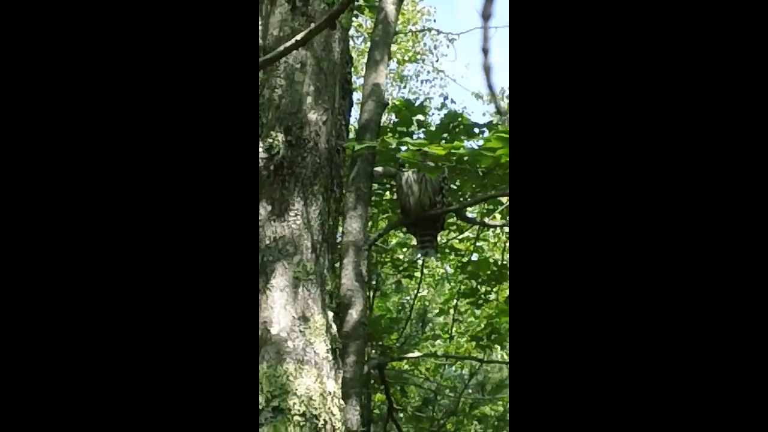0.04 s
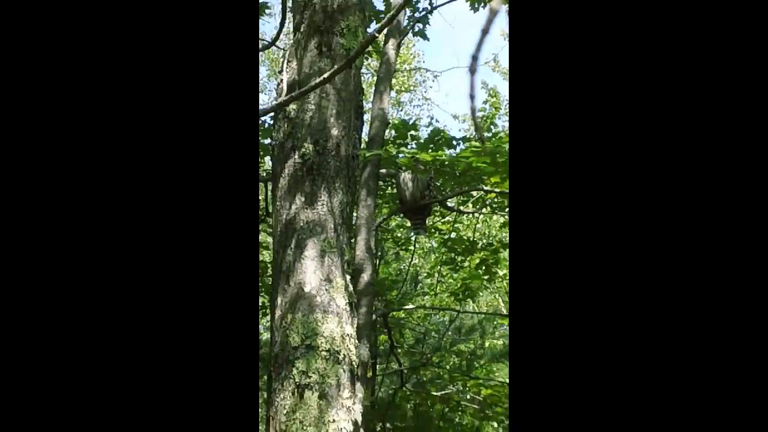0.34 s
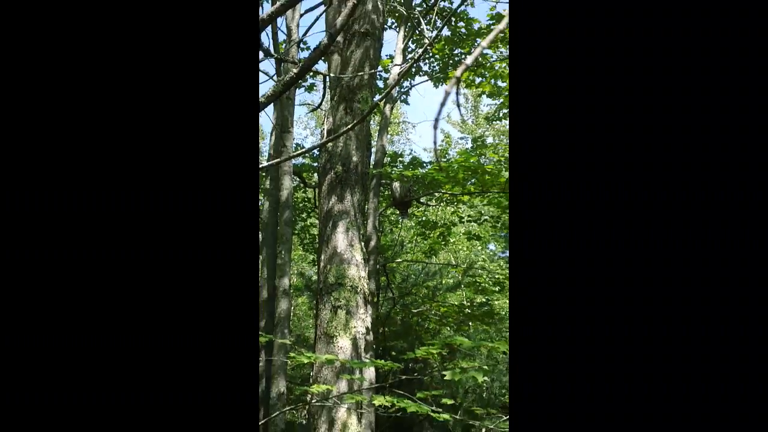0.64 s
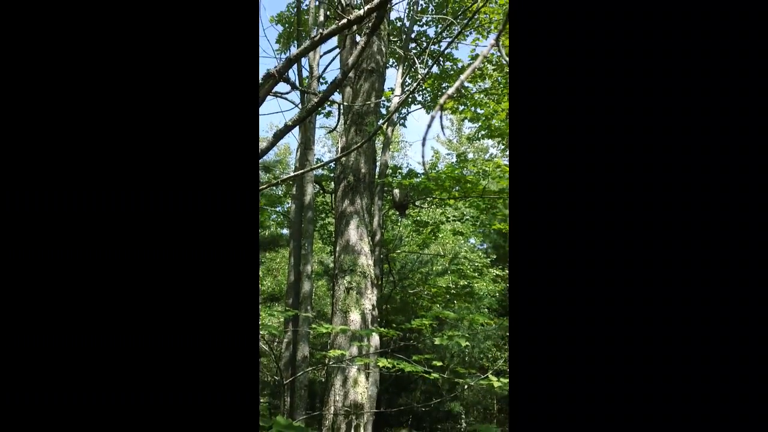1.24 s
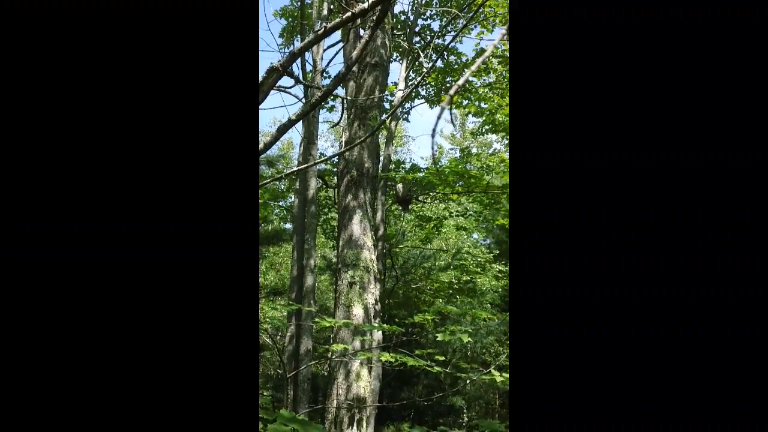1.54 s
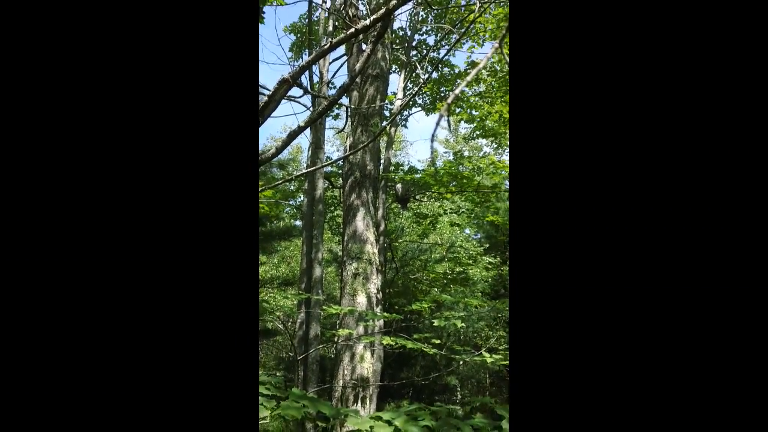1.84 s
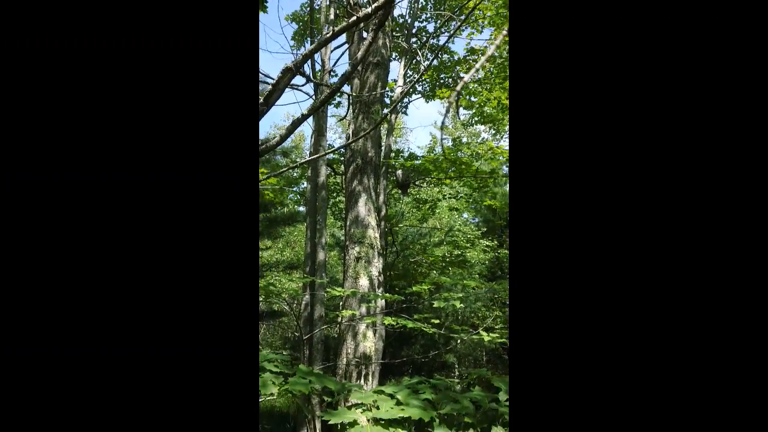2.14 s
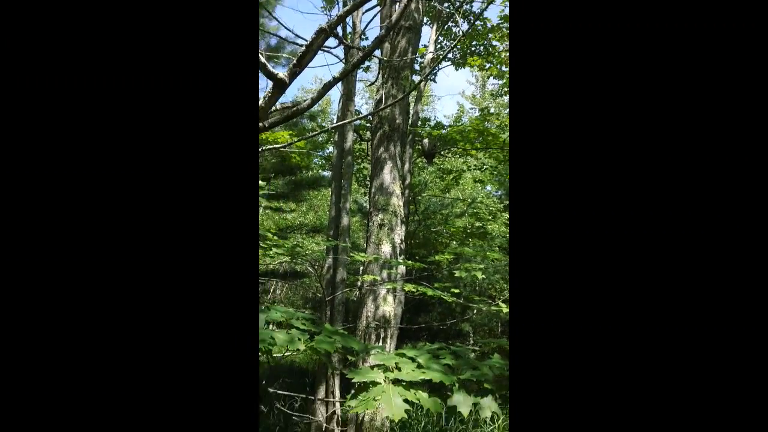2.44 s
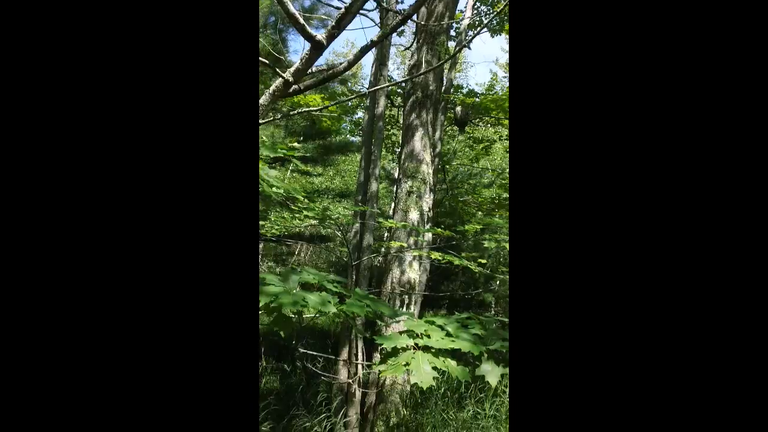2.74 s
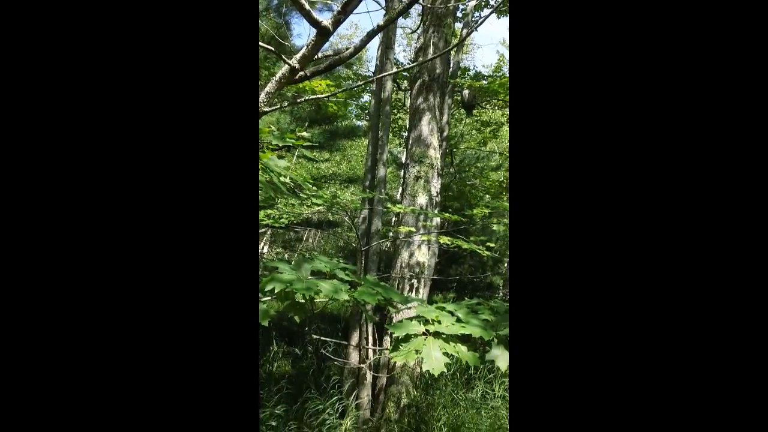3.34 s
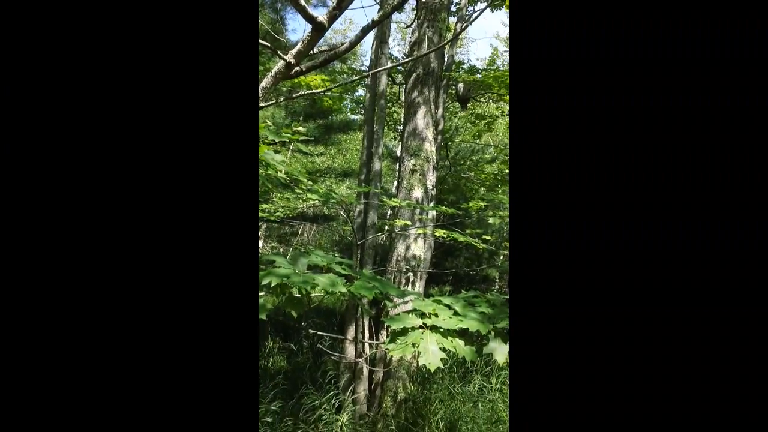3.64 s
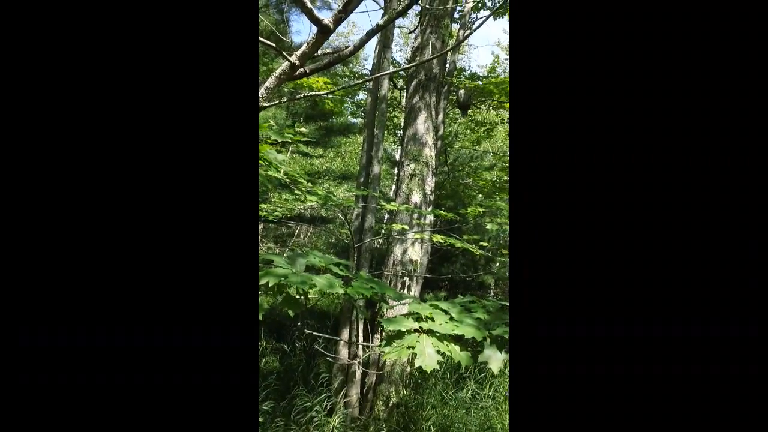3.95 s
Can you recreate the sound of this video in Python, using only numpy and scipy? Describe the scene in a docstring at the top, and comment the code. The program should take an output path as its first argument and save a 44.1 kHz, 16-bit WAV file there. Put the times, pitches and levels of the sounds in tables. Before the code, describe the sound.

A small animal, probably a chipmunk, chirps sharply in a forest with light wind and twig snaps.

```python
"""First comes the ring of an alarm chip dying away in a wood, over light wind and a faint far rumble.
The caller, probably a chipmunk, keeps chipping: each call is a short arch of pitch, strongest in its
second harmonic. Trunks scatter the chips and the forest rings on at their top pitch.
Near the microphone twigs snap, leaves swish and dead wood knocks softly underfoot."""
import sys
import numpy as np
from scipy import signal
from scipy.fft import rfft, irfft, next_fast_len
from scipy.io import wavfile
from scipy.ndimage import map_coordinates

SR = 44100
rng = np.random.default_rng(int(sys.argv[2]) if len(sys.argv) > 2 else 0)


def inscribe(sig):
    """Save sig as 16-bit PCM at rate SR to the path in sys.argv[1].

    A 1-D sig is mono; a 2-D sig holds one channel per row.
    Samples are clipped to [-1, 1] before scaling.
    """
    pcm = np.round(np.clip(np.atleast_2d(sig).T, -1, 1) * 32767)
    wavfile.write(sys.argv[1], SR, pcm.astype(np.int16))


N = 176400


def amp(db):
    """Decibels to gain."""
    return 10 ** (np.asarray(db) / 20)


def unit(x):
    """Scale to rms 1."""
    return x / np.sqrt(np.mean(x ** 2) + 1e-20)


def db_at(spectrum, hz):
    """Read (Hz, dB) points along a log frequency axis."""
    freqs, levels = np.transpose(spectrum)
    return np.interp(np.log(hz + 1), np.log(freqs + 1), levels)


def curve(rows):
    """Join (seconds, value) points, one value per sample."""
    return np.interp(np.arange(N) / SR, *np.transpose(rows))


def wobble(rate):
    """A smooth random curve, rate knots a second."""
    return map_coordinates(rng.standard_normal(8192), [np.arange(N) * rate / SR], mode="wrap")


def filtered(x, response):
    """Filter x by a gain that depends on frequency."""
    size = next_fast_len(N + 8192)
    return irfft(rfft(x, size) * response(np.fft.rfftfreq(size, 1 / SR)), size)[:N]


def noise(spectrum):
    """Coloured noise of rms 1."""
    return unit(filtered(rng.standard_normal(N), lambda hz: amp(db_at(spectrum, hz))))


def add(track, start, sound):
    """Mix a sound in at start seconds; whatever lies outside the track is cut."""
    i = round(start * SR)
    part = sound[max(-i, 0):max(N - i, 0)]
    track[max(i, 0):][:len(part)] += part


def burst(start, rise, t60):
    """An envelope that rises, then falls 60 dB in t60 seconds."""
    t, out = np.arange(int((rise + t60) * SR)) / SR, np.zeros(N)
    add(out, start, np.minimum(t / rise, 1) * amp(-60 * np.maximum(t - rise, 0) / t60))
    return out


# The low end, far off. Each row: frequency in Hz, relative level in dB.
RUMBLE_SPECTRUM = [(30, -41), (66, -23), (83, -0.5), (100, -10.5), (135, -23.5), (300, -63)]
# Its slow swell. Each row: time in seconds, relative level in dB.
RUMBLE_SWELL = [(0, -58), (.7, -53), (1.2, -52), (2.2, -51.5), (2.8, -53), (3.9, -57)]


def distant_rumble():
    """A faint rumble near 83 Hz swells and recedes in the distance."""
    return noise(RUMBLE_SPECTRUM) * amp(curve(RUMBLE_SWELL) - 0.5)


# Wind overhead. Each row: frequency in Hz, relative level in dB.
WIND_SPECTRUM = [(20, -25), (35, -15.5), (55, -9.5), (110, -2.5), (170, -6.5), (300, -7), (550, -7),
                 (760, -5.5), (1100, -9), (1800, -12.5), (3000, -19.5), (4500, -23), (6400, -24.5),
                 (9500, -27.5), (11800, -37.5), (14300, -35.5), (15500, -34.5)]
# Its strength. Each row: time in seconds, relative level in dB.
WIND_STRENGTH = [(0.0, -46), (0.45, -46), (1.03, -44.5), (2.23, -44.5), (2.55, -46.5), (2.9, -46),
                 (3.32, -45.5), (3.7, -45)]


def wind():
    """Light wind in the crowns, with slight gusts and a quicker flutter."""
    air = noise(WIND_SPECTRUM)
    gust_db, flutter_db = .12 * wobble(4.69), .35 * wobble(40)
    return air * amp(curve(WIND_STRENGTH) + 1.4 + gust_db + flutter_db)


# The thud of a footfall. Each row: frequency in Hz, relative level in dB.
THUD_SPECTRUM = [(60, -21), (150, -16), (700, -12), (1500, -27), (5000, -40), (15000, -58)]
# Knocks at ground level. Each row: start in seconds, resonance in Hz, level in dB, t60 in seconds.
KNOCKS = [(3.441, 430, -42.5, 0.19), (3.49, 600, -42, 0.18), (3.745, 800, -36, 0.069),
          (3.749, 520, -39, .05)]


def wood_knocks(width_hz=46, ring_db=5):
    """Dead wood knocks softly underfoot: a dull thud with one resonance."""
    out = np.zeros(N)
    for start, ring_hz, db, t60 in KNOCKS:
        ring = lambda hz: amp(ring_db) / (1 + ((hz - ring_hz) / width_hz) ** 2)
        colour = lambda hz: amp(db_at(THUD_SPECTRUM, hz)) + ring(hz)
        knock = unit(filtered(rng.standard_normal(N), colour))
        out += amp(db) * knock * burst(start, rise=.0042, t60=t60)
    return out


# Dry litter on the forest floor. Each row: frequency in Hz, relative level in dB.
CRACKLE_SPECTRUM = [(1200, -6), (2000, -5.5), (2800, -7.5), (4000, -2.5), (6000, -3), (9000, -0.5),
                    (11400, -7), (12400, -21), (14300, -15), (15500, -19)]


def crackle(tilt_db, low_hz=2200):
    """Bright noise of dry twigs and leaves, tilted by tilt_db an octave and rolled off below low_hz."""
    def colour(hz):
        low_cut = hz ** 2 / (hz ** 2 + low_hz ** 2)
        return amp(db_at(CRACKLE_SPECTRUM, hz) + tilt_db * np.log2((hz + 1) / low_hz)) * low_cut
    return unit(filtered(rng.standard_normal(N), colour))


# Leaves nearby. Each row: start, rise and t60 in seconds, level in dB, tilt in dB per octave.
LEAF_SWISHES = [(1.08, 0.11, .9, -51, -4.5), (1.3, 0.071, 0.98, -46, -8.5),
                (1.579, .006, 0.33, -37.5, -3.5), (1.6, 0.024, 0.51, -45.5, -4)]


def leaf_swishes():
    """Dry leaves swish up and die away slowly."""
    return sum(amp(db) * crackle(tilt) * burst(start, rise, t60)
               for start, rise, t60, db, tilt in LEAF_SWISHES)


# Twigs nearby. Each row: start in seconds, crack and echo levels in dB, tilt in dB per octave.
TWIG_SNAPS = [(0.9845, -26, -35.5, 1), (1.203, -35, -49, 8.5), (1.292, -40, -45, -1.5),
              (1.5329, -43, -42.5, -1.5), (1.591, -40, -40.5, -2.5), (1.8881, -49, -54, 3)]


def twig_snaps():
    """A twig cracks sharply and the wood echoes it."""
    out = np.zeros(N)
    for start, db, echo_db, tilt in TWIG_SNAPS:
        crack = amp(db) * burst(start, rise=.00042, t60=.012)
        echo = amp(echo_db) * burst(start, rise=.004, t60=.61)
        out += crackle(tilt) * (crack + echo)
    return out


# Twigs close to the microphone. Each row: start in seconds, level in dB, tilt in dB per octave.
TWIG_TICKS = [(2.3564, -31, -4.5), (2.361, -33, -7), (2.3642, -44, -2.5), (3.3545, -37, 0),
              (3.3625, -38.5, -1)]


def twig_ticks():
    """The nearest twigs only tick, with no echo."""
    return sum(amp(db) * crackle(tilt, low_hz=1100) * burst(start, rise=.001, t60=.0058)
               for start, db, tilt in TWIG_TICKS)


def forest_echo(call, near_t60=.18, far_t60=.67, far_db=-12.5, onset_s=.0021):
    """Dense scatter from near trunks, then a long faint tail; the echo has the energy of the call."""
    t = np.arange(SR * 3 // 4) / SR
    fade = amp(-60 * t / near_t60) + amp(far_db - 60 * t / far_t60)
    scatter = rng.standard_normal(len(t)) * fade * (1 - np.exp(-t / onset_s))
    echo = signal.fftconvolve(call, scatter)
    return echo * np.linalg.norm(call) / np.linalg.norm(echo)


# The animal's throat. Each row: frequency in Hz, gain in dB.
THROAT_RESPONSE = [(1500, -14), (2600, -9.5), (3300, 0.5), (4200, -6.5), (5500, -4.5), (6500, -0.5),
                   (9300, -2), (10400, -9), (12000, -24), (15000, -21)]


def harmonic(k, pitch_hz, db):
    """Harmonic k of the voice, coloured as it sweeps through the throat's resonances."""
    phase = 2 * np.pi * np.cumsum(pitch_hz) / SR
    return np.sqrt(2) * amp(db + db_at(THROAT_RESPONSE, k * pitch_hz)) * np.sin(k * phase)


def pitch_arch(u):
    """Pitch as a share of its top, for u from -1 to 1: it shoots up, arches over and plunges."""
    arch = .0702 * (u - .092) ** 2  # peaks a little past the middle
    sweep = np.where(u < 0, .404 * abs(u) ** 9.09, .364 * abs(u) ** 6.2)
    return 1 - arch - sweep


# The voice's weaker harmonics. Each row: multiple of the fundamental, relative level in dB.
WEAK_HARMONICS = [(1, -17.5), (3, -13), (4, -21.5)]
# Its rasp. Each row: frequency in Hz, relative level in dB.
RASP_SPECTRUM = [(1500, -26), (3000, -4.5), (5500, -2.5), (9500, -1.5), (11500, -20.5), (16000, -30)]
# Calls from among the trees. Each row: start and length in seconds, top of the fundamental in Hz,
# then direct gain, echo gain, the second harmonic's gain in the sweeps and harshness, all in dB.
ALARM_CHIPS = [(-.05, 0.027, 3354, -27, -30.5, 3, -2), (0.3745, 0.033, 3366, -31, -29, 3.5, 0.5),
               (0.7526, .029, 3286, -27.5, -29, 0.5, -1.5), (1.4, .031, 3412, -31.5, -31.5, 6, 4),
               (2.044, 0.031, 3407, -30, -26.5, 1, 0.5), (2.57, 0.032, 3454, -19.5, -24.5, -4, -4.5),
               (3.101, .030, 3453, -28, -25, -3.5, 0.5), (3.441, .030, 3196, -29, -30, -5, 2),
               (3.892, 0.0308, 3240, -31.5, -35.5, 2, 1)]
RASP_DB, RASP_SWEEP_DB, WEAK_SWEEP_DB, PLUNGE_DB = -21, 14.5, 3, 4
ATTACK_S, RELEASE_S, SWELL_DB = .0023, .0011, 1.5
TRUNK_DB, TRUNK_SPREAD_S = -14.5, .012


def alarm_chips():
    """Each chip turns hard and raspy in its two sweeps, and arrives both direct and off the trees."""
    out, rasp = np.zeros(N), noise(RASP_SPECTRUM)
    jitter = 1 + .006 * wobble(rate=900)
    for start, length, top_hz, db, echo_db, sweep_db, harsh_db in ALARM_CHIPS:
        t = np.arange(int(length * SR)) / SR
        here = np.arange(len(t)) + int(abs(start) * SR)
        u = 2 * t / length - 1  # u ** 2 is large in the sweeps; u ** 3 favours the plunge
        pitch_hz = top_hz * pitch_arch(u) * jitter[here]
        whistle = harmonic(2, pitch_hz, sweep_db * u ** 2 + PLUNGE_DB * u ** 3)
        edge = sum(harmonic(k, pitch_hz, level + WEAK_SWEEP_DB * u ** 2) for k, level in WEAK_HARMONICS)
        grit = amp(RASP_DB + RASP_SWEEP_DB * u ** 2) * rasp[here]
        gate = np.clip(t / ATTACK_S, 0, 1) * np.clip((length - t) / RELEASE_S, 0, 1)
        call = gate * amp(SWELL_DB * u / 2) * (whistle + amp(harsh_db) * (edge + grit))
        add(out, start, amp(db) * call)
        for delay in rng.uniform(0, TRUNK_SPREAD_S, size=4):  # reflections off the nearest trunks
            add(out, start + delay, amp(echo_db + TRUNK_DB) * call)
        add(out, start, amp(echo_db) * forest_echo(call))
    return out


def scene():
    """The whole wood sits dead centre, the same in both channels."""
    chips = alarm_chips()
    snaps, ticks, leaves, knocks = twig_snaps(), twig_ticks(), leaf_swishes(), wood_knocks()
    grain = unit(amp(1.1 * wobble(rate=600)))  # a fast flicker roughens twigs and leaves
    centre = chips + (snaps + leaves) * grain + ticks + knocks + wind() + distant_rumble()
    return np.array([centre, centre])


# Hiss at the microphone. Each row: frequency in Hz, relative level in dB.
HISS_SPECTRUM = [(20, -21.5), (100, 2), (250, 8), (600, 6), (1200, -20.5), (3000, 0.5), (5000, 2),
                 (9500, 0), (11800, -14.5), (14500, -1), (15600, -5.5)]
HISS_DB, STOP_S = -63.5, 3.912
NOTCH_HZ, NOTCH_WIDTH_HZ, NOTCH_DB, TOP_HZ = 12750, 360, -26, 15600


def record(dry):
    """Each channel hisses faintly; the microphone has a narrow treble notch and passes nothing on top."""
    def microphone(hz):
        notch_db = NOTCH_DB * np.exp(-((hz - NOTCH_HZ) / NOTCH_WIDTH_HZ) ** 2)
        return amp(notch_db) * (hz < TOP_HZ)
    fade_out = np.clip((STOP_S - np.arange(N) / SR) / .005 + 1, 0, 1)  # silent just before the end
    hissy = [channel + amp(HISS_DB) * noise(HISS_SPECTRUM) for channel in dry]
    return np.array([filtered(channel * fade_out, microphone) for channel in hissy])


dry = scene()
out = record(dry)
inscribe(out)
```